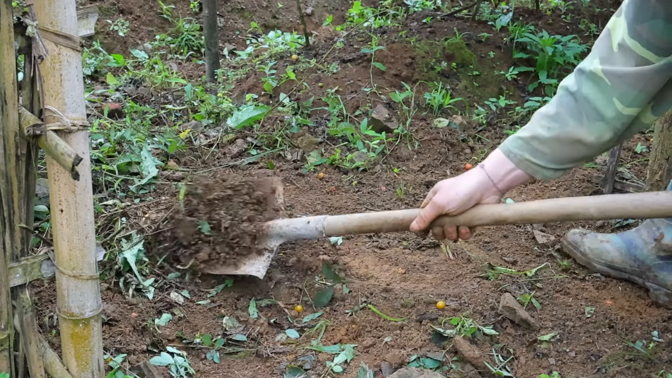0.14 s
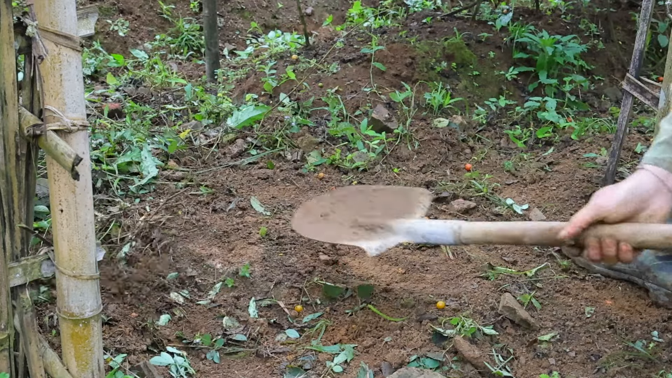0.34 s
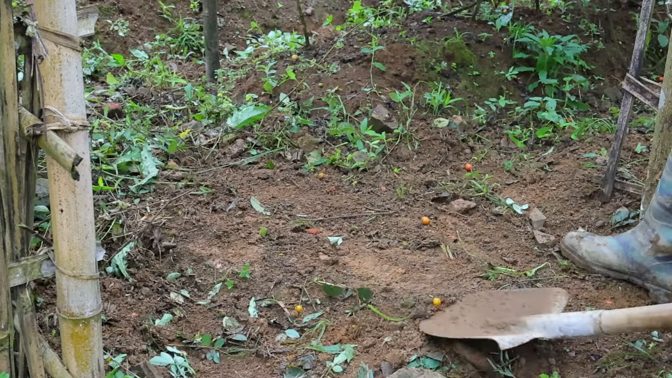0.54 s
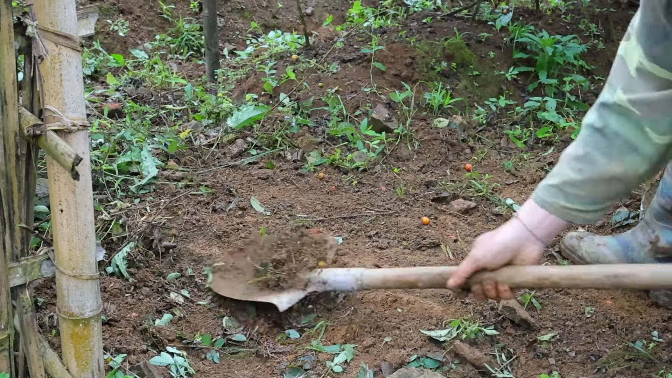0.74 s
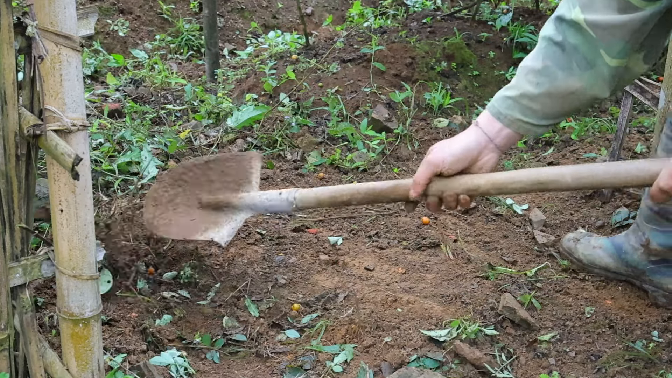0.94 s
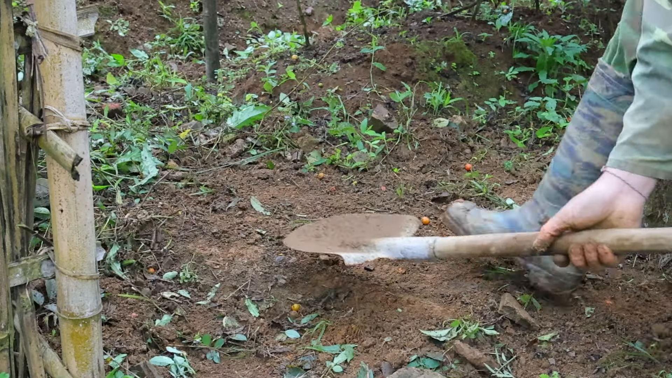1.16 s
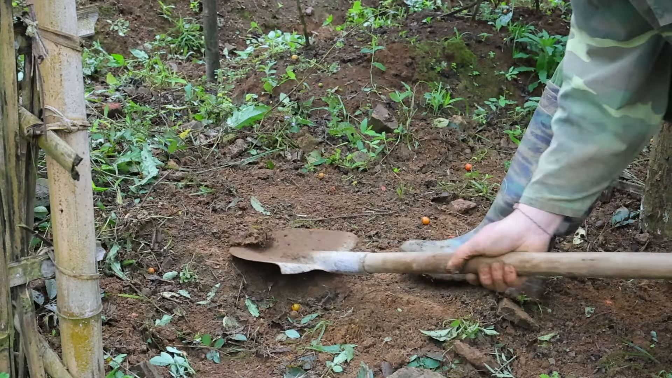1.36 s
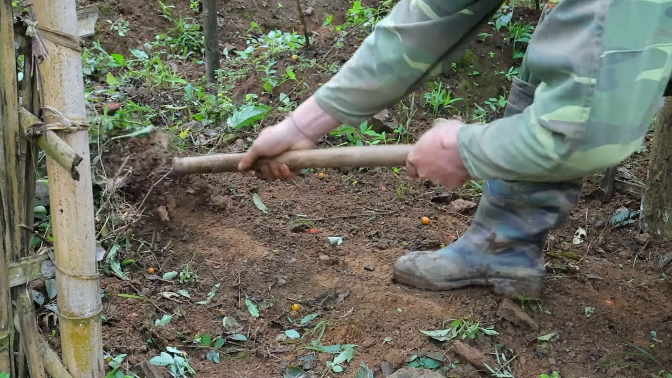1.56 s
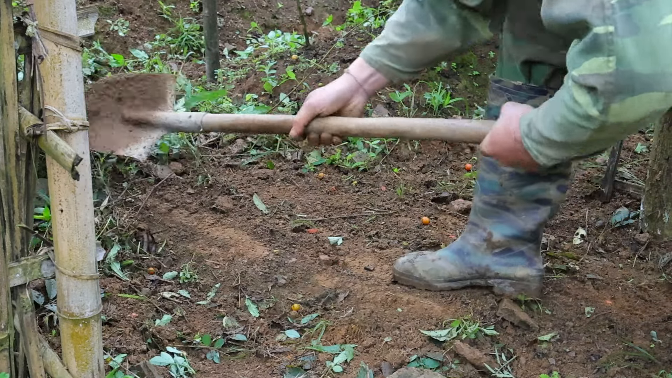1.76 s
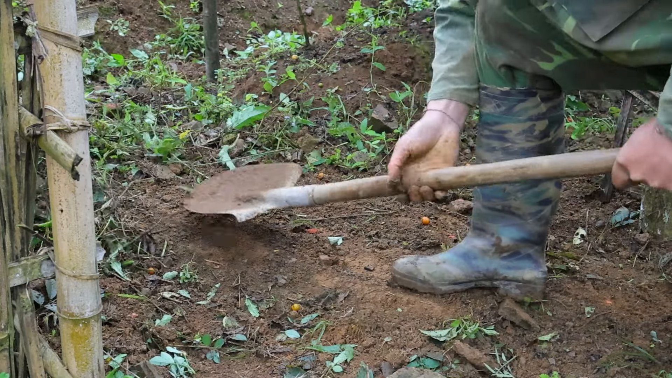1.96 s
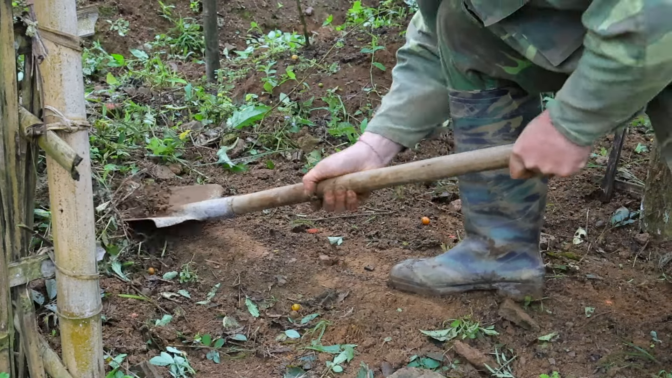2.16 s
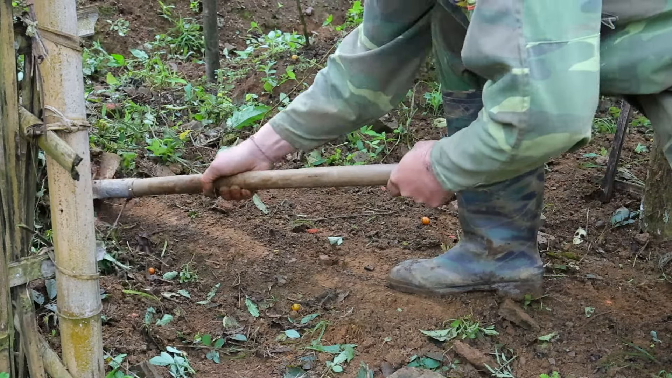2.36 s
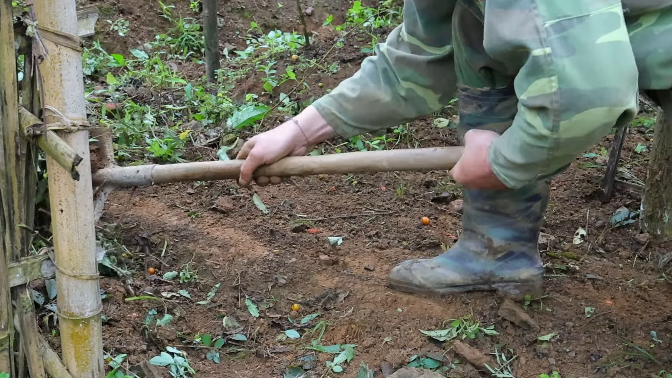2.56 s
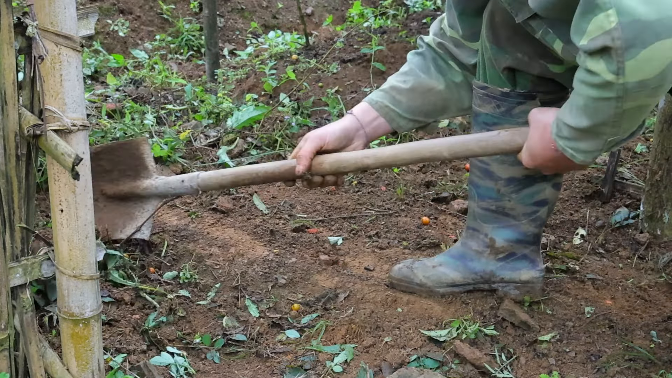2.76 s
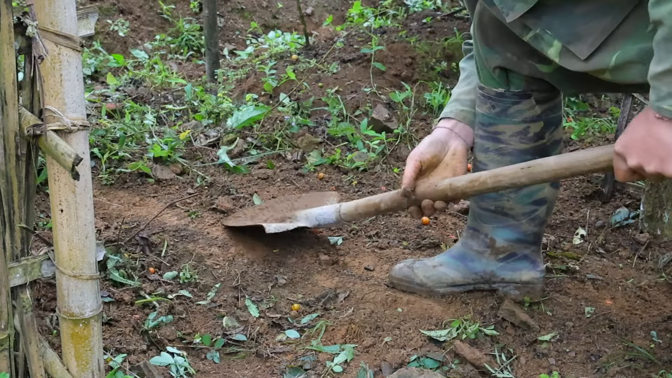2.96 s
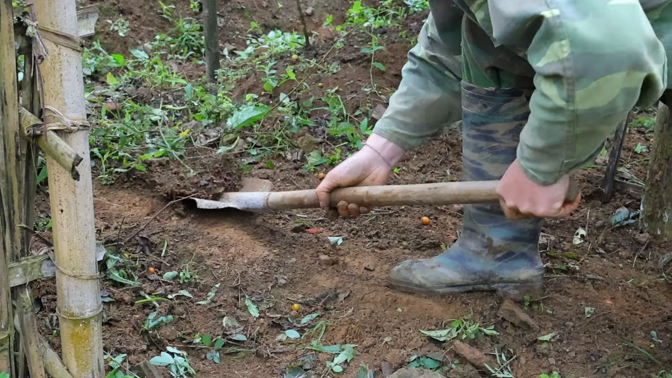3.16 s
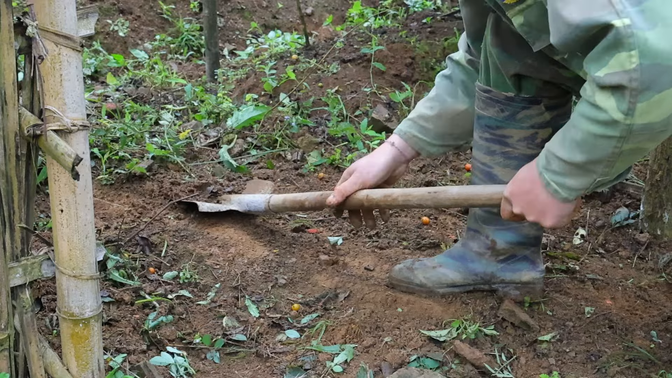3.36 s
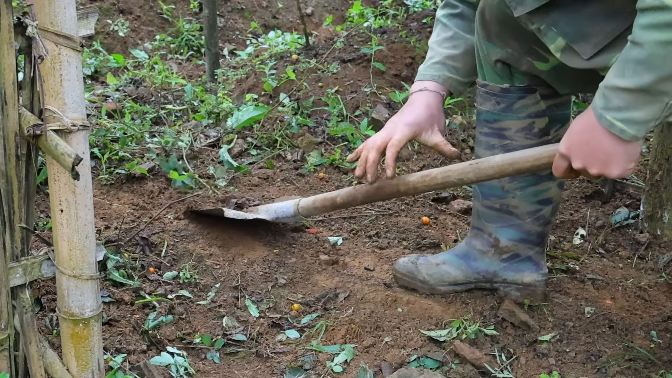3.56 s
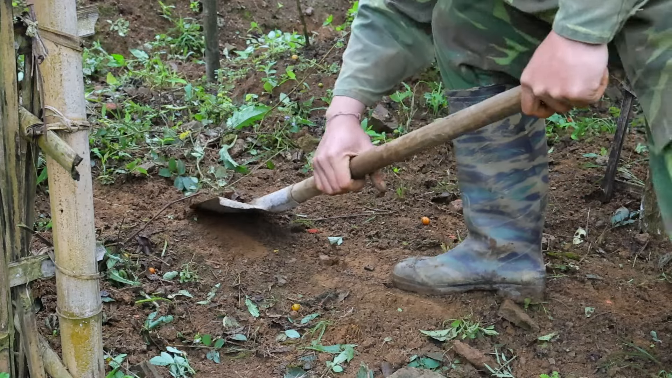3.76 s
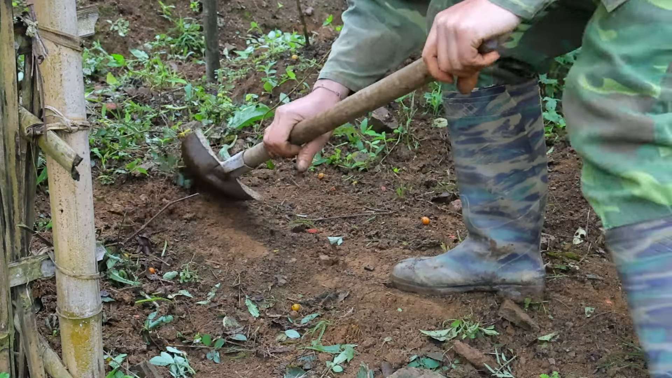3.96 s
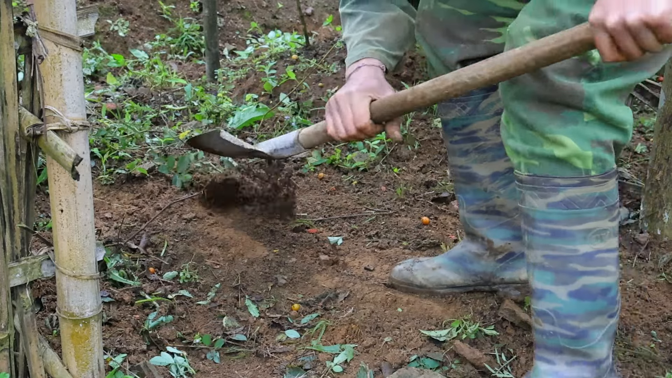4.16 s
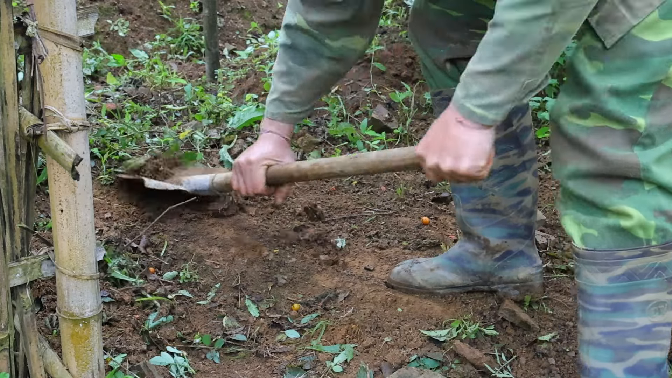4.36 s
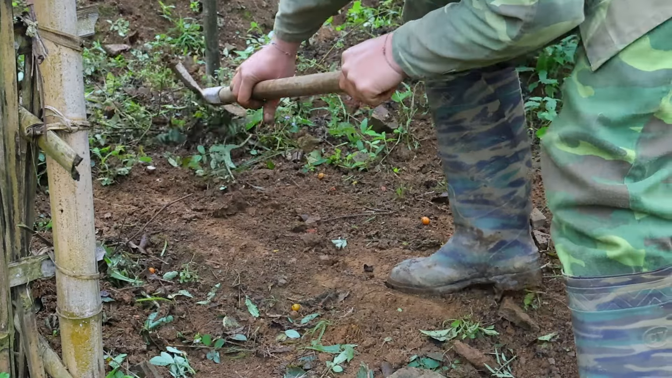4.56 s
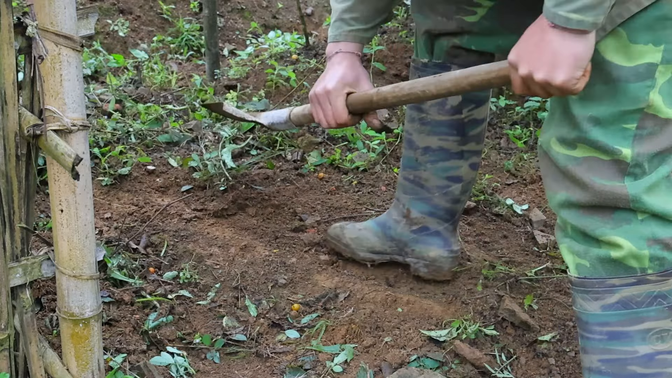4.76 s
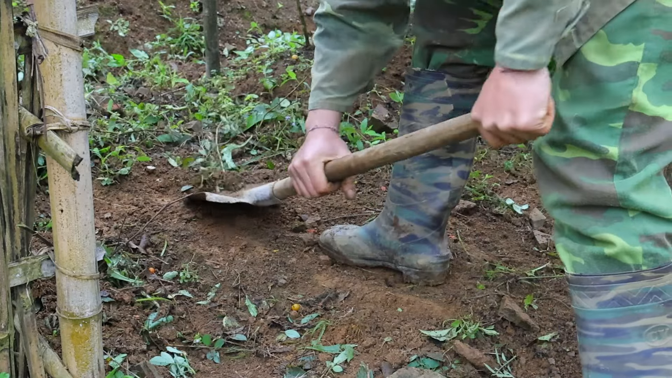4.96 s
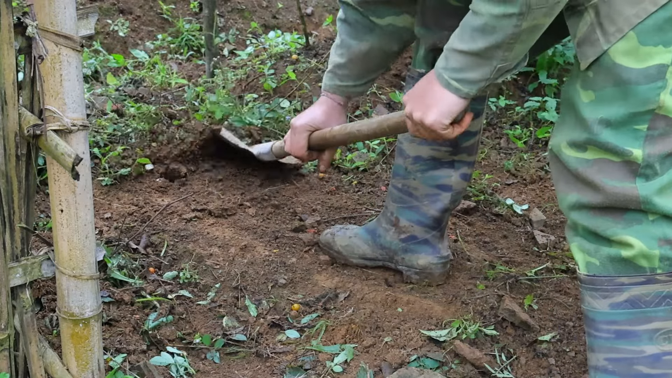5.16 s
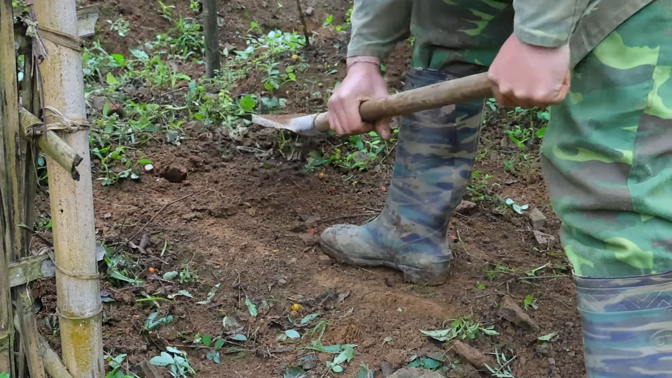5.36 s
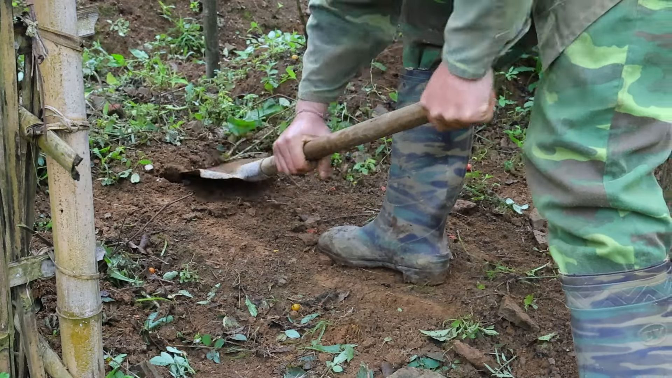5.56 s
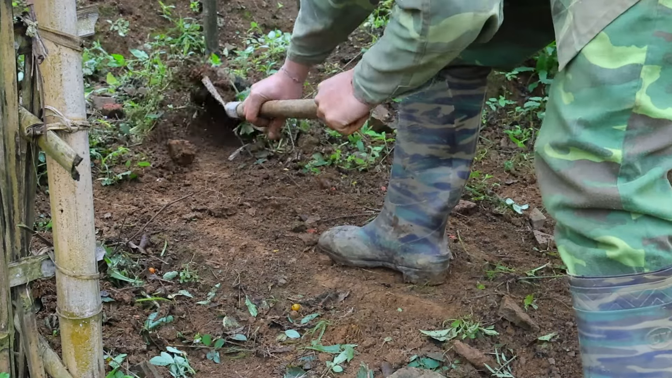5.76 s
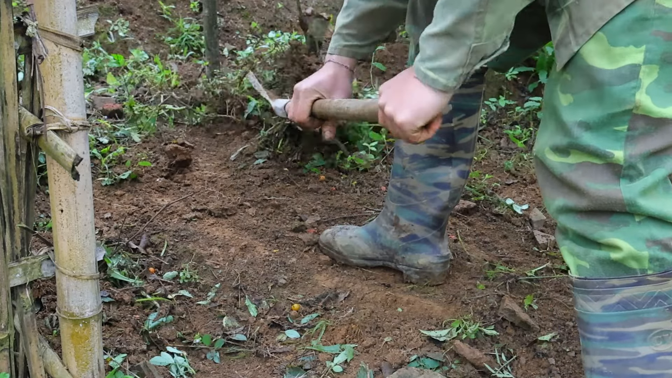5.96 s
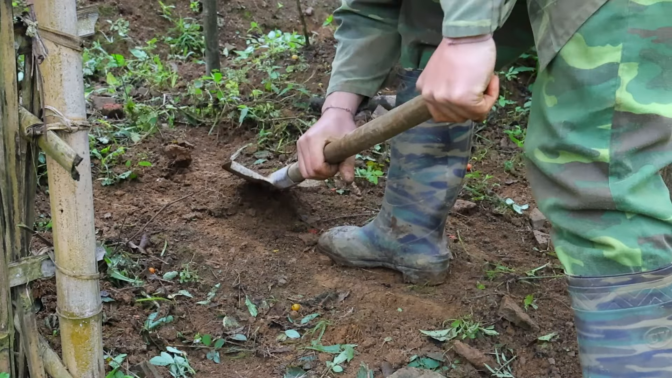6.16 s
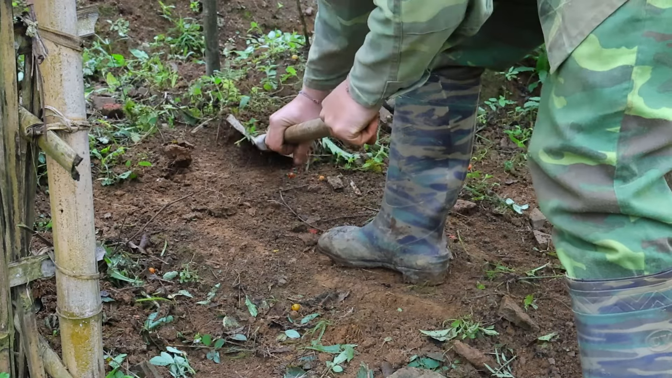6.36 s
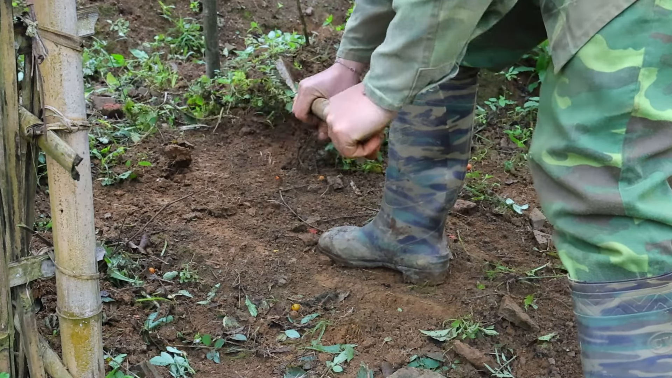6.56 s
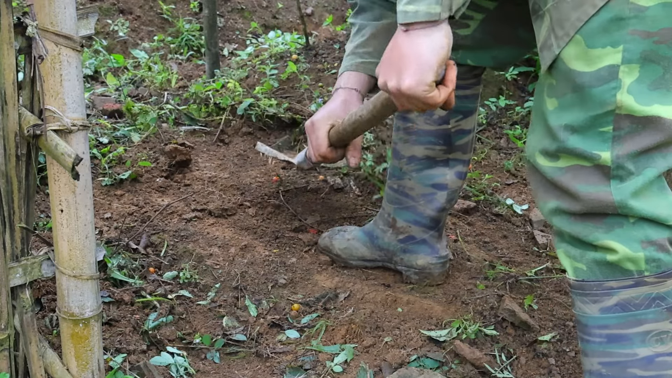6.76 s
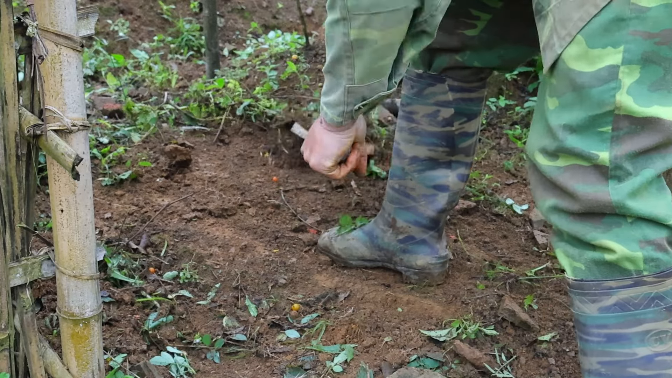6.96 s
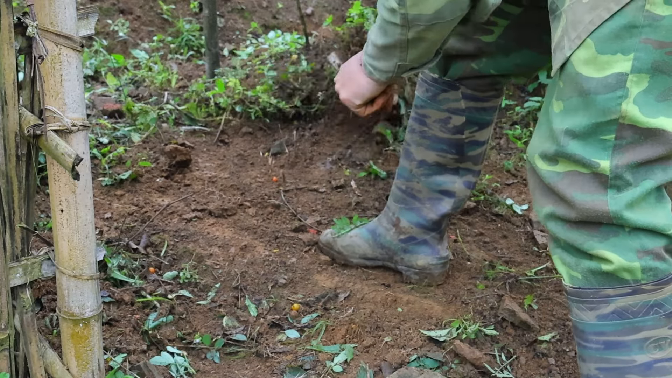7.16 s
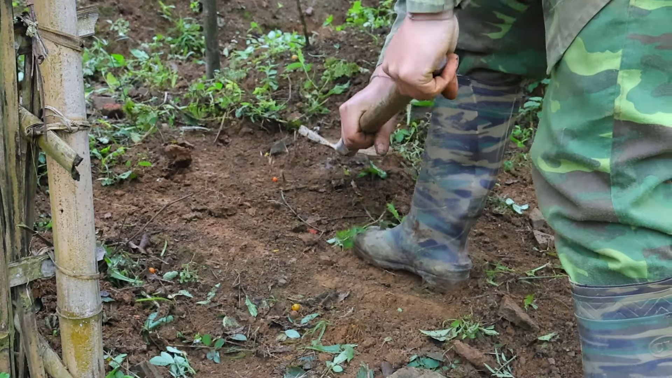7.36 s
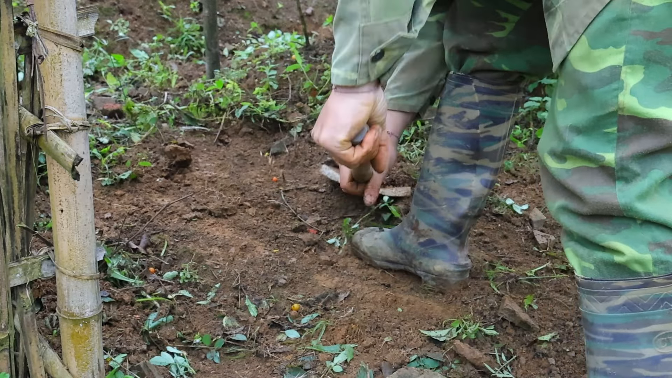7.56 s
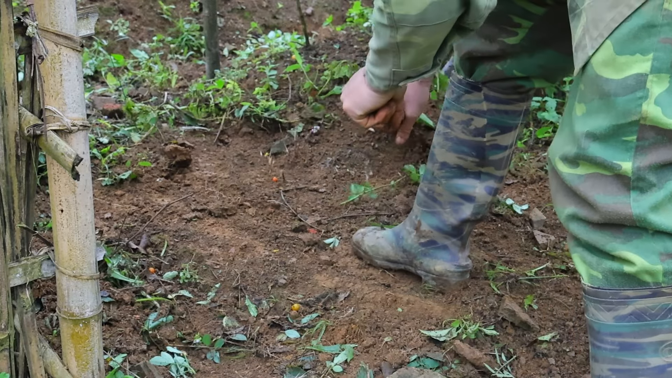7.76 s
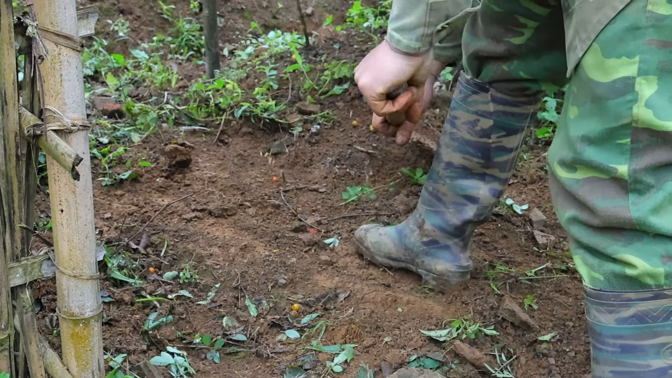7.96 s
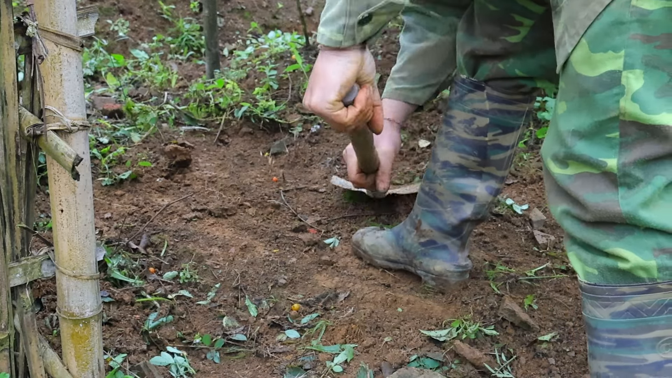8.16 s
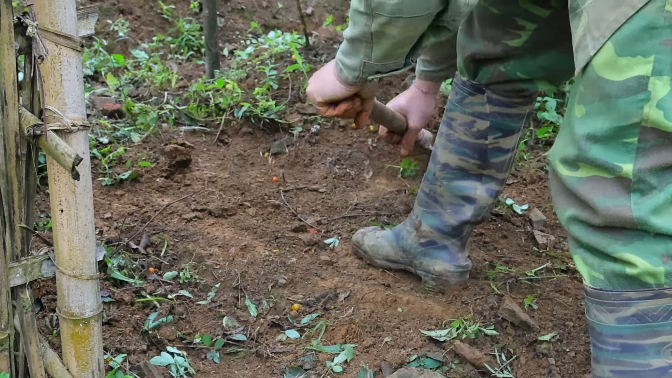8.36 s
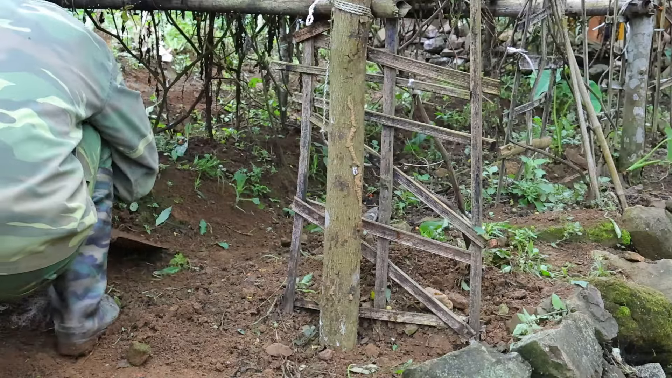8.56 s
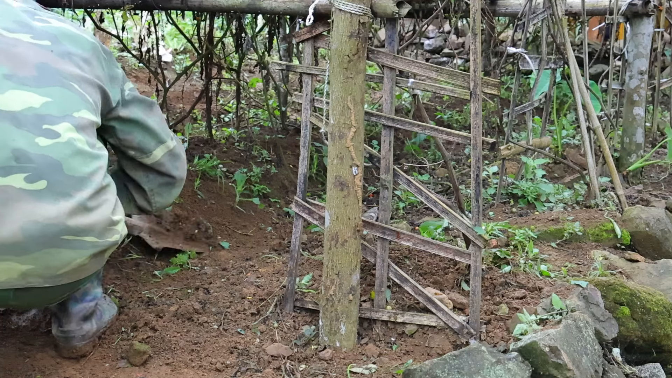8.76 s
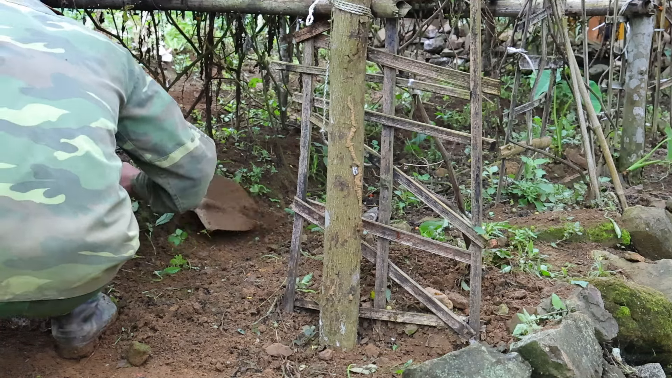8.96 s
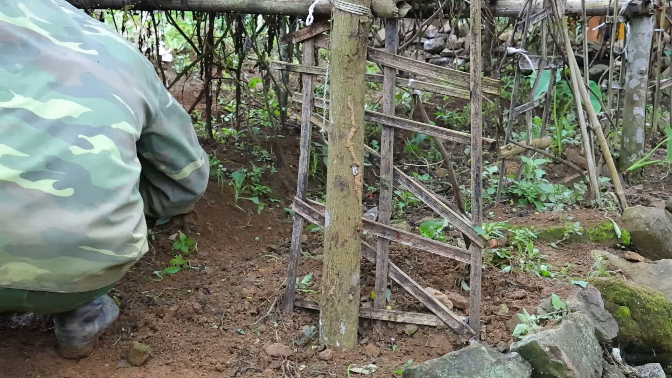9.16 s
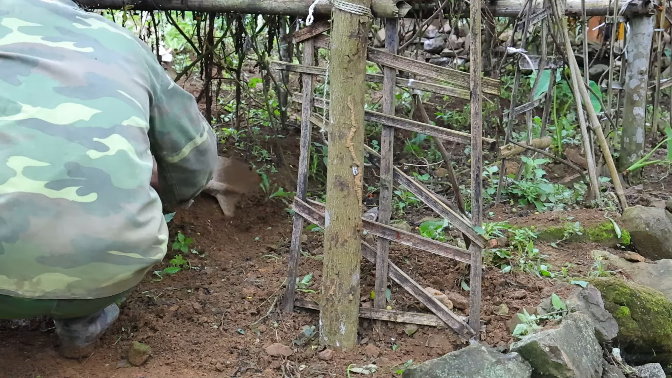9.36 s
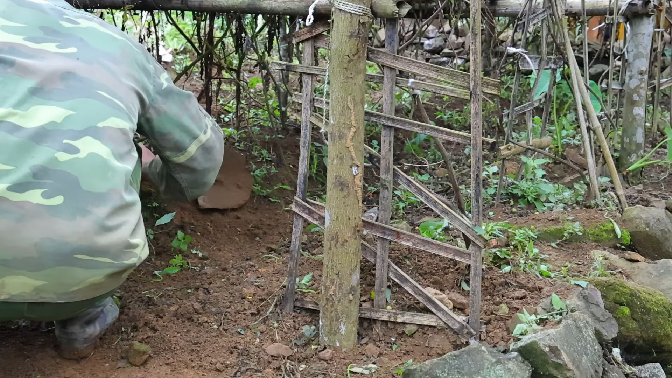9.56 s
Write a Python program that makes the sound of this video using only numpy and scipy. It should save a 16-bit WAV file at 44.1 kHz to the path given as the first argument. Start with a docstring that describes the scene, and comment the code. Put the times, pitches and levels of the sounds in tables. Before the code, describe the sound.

Close, dry shovel strokes bite into gritty earth, roots and pebbles crackling and clinking between short rustling pauses outdoors.

```python
"""Shovel in stony soil

A steel shovel blade chops and scrapes through stony garden soil close to a two-port microphone.
Strokes are rushes of filtered clicks; crunches are click swarms where clods and roots give way; stones
clink as roughened sines. The blade is a bank of modes, short in the soil and long in the air, over
low thumps of boots and blade, distant resonant noise and a quiet outdoor hiss."""
import sys
import numpy as np
from scipy import signal
from scipy.fft import rfft, irfft, next_fast_len
from scipy.io import wavfile
from scipy.ndimage import uniform_filter1d

SR = 44100
rng = np.random.default_rng(int(sys.argv[2]) if len(sys.argv) > 2 else 0)


def dump(signal):
    """Clip the signal to [-1, 1] and save it as 16-bit WAV at the path in sys.argv[1]."""
    limited = np.clip(np.atleast_2d(signal).T, -1, 1)
    pcm = np.round(limited * 32767).astype(np.int16)
    wavfile.write(sys.argv[1], SR, pcm)


def boost_factor(decibels):
    """Convert a level in decibels to a linear amplitude factor."""
    exponent = np.asarray(decibels, float) / 20
    return 10 ** exponent


N = 423801
SIZE = next_fast_len(N + SR, True)  # FFT length with room for tails

# Colour of leaves and air: pitch_hz, relative level_db (per Hz)
AIR_COLOUR = [(25, 15), (60, -9.5), (200, -3), (450, -2.5), (1200, -3), (2400, -23), (5500, -15),
              (11000, -16.5), (16000, -19)]
AIR_DB = -53

# Hollow blips and low rumble in the background, mean levels: start_s, blips_db, rumble_db
DISTANT = [(0.0, -52.5, -57.5), (0.43, -54, -61), (0.85, -50, -67), (1.39, -56.5, -63), (3.16, -54, -62),
           (3.51, -53, -71), (4.44, -48.5, -51), (4.63, -62, -61), (5.17, -47.5, -58.5), (5.67, -61, -51.5),
           (6.13, -60.5, -64.5), (6.37, -49, -53), (6.66, -61, -65), (7.68, -49, -61), (8.03, -58.5, -65),
           (8.4, -52, -67), (8.99, -55.5, -75), (9.61, -63, -67)]
BLIP_HZ, BLIP_WANDER, BLIP_WIDTH_HZ = 710, 0.057, 130  # wander as a share of the pitch
RUMBLE_HZ, RUMBLE_WANDER, RUMBLE_WIDTH_HZ = 113, 0.064, 150

# Boots and blade landing on soft ground: start_s, level_db, settled pitch_hz, t60_s
THUMPS = [(1.315, -27, 104, 0.028), (2.125, -45, 75.4, 0.15), (3.246, -32, 240, 0.059),
          (4.234, -16.5, 161, 0.036), (4.45, -25.5, 109, 0.088), (4.893, -27, 178, 0.019),
          (5.111, -29, 127, 0.092), (5.676, -30, 69.5, 0.072), (6.235, -38.5, 167, 0.11)]

# Stones that clink with a pitch of their own: start_s, level_db, pitch_hz, t60_s
STONES = [(0.0267, -11.5, 3370, 0.047), (.137, -15, 3470, 0.027), (0.615, -18.5, 1232, 0.06),
          (.699, -17.5, 3630, .06), (0.711, -17, 3800, 0.044), (0.744, -19.5, 3290, .04),
          (2.2737, -27.5, 1510, 0.048), (3.168, -28, 3380, 0.036), (3.2536, -17.5, 902, 0.036),
          (4.225, -21, 1230, 0.019), (4.461, -17, 1504, 0.089), (4.4961, -20.5, 830, .07),
          (4.7485, -38, 2730, 0.074), (4.8762, -45, 1360, .03), (5.083, -18.5, 3140, 0.087),
          (5.6663, -23, 1654, 0.08), (6.393, -27.5, 1600, 0.047), (6.959, -24, 1350, 0.055),
          (7.0254, -15, 1210, 0.059), (8.2955, -15.5, 1366, 0.091), (8.4124, -14.5, 4510, 0.066),
          (8.872, -34.5, 4300, 0.032), (9.2145, -15, 2152, 0.069), (9.2148, -14.5, 4300, 0.028)]
CHATTER_WIDTH_HZ = 300

# Soil trickling and leaves rustling between strokes: start_s, level_db, crackle_db (against the level)
RUSTLE = [(0, -44.5, -1.5), (.9, -64.5, -7), (1.28, -66, 1), (1.8, -53, -0.5), (2.6, -53, -3),
          (3.05, -62, 5.5), (3.8, -53, -11), (4.2, -59, 1), (4.62, -55.5, 6), (4.82, -62.5, 6.5),
          (5.2, -49.5, -3.5), (5.45, -58, 0), (6.2, -55.5, 6), (6.7, -66.5, 4), (7.4, -55, 4),
          (8.0, -58, -18), (9.15, -69, -21), (9.35, -46.5, -2), (9.61, -59, -10)]

# Strokes of the blade and boots through grit:
# peak_s, level_db, crackle_db (above 4 kHz, against the level), rise_s, fall_s
STROKES = [(.005, -29, 11, 0.064, 0.12), (.15, -40, 1, 0.11, 0.11), (.5, -49.5, 0.5, 0.54, 0.092),
           (.63, -40, -17, 0.075, 0.11), (.72, -30.5, -1, 0.16, 0.43), (.91, -42.5, -1, .15, 0.35),
           (1.149, -48, 5.5, .2, 0.23), (1.37, -61, 12.5, 0.25, 0.067), (1.54, -30, 5, 0.27, 0.14),
           (1.64, -34, 4, 0.33, 0.34), (2.32, -29.5, 3.5, 0.36, 0.32), (2.88, -45, -5.5, 0.36, 0.47),
           (3.18, -26.5, 6, 0.14, 0.21), (3.241, -28, -6, 0.22, .075), (3.46, -54, 11, .08, 0.12),
           (3.64, -52, 10.5, 0.14, 0.48), (3.922, -40, 6, 0.44, 0.36), (4.481, -35, 0.5, 0.34, 0.37),
           (4.89, -44.5, -1.5, 0.2, 0.23), (5.09, -22.5, -1, 0.03, 0.14), (5.7, -26, 3.5, 0.075, 0.23),
           (6.421, -34.5, 5, 0.37, 0.2), (6.88, -52.5, -1.5, 0.36, 0.38), (7.019, -27.5, -0.5, 0.11, 0.27),
           (7.682, -19, 3.5, 0.074, 0.053), (7.791, -38, 3.5, 0.36, 0.19), (8.292, -29.5, 0, 0.068, 0.28),
           (8.43, -47, 12.5, 0.44, 0.23), (8.57, -36.5, -9, 0.14, .1), (8.83, -61.5, 0.5, 0.16, 0.19),
           (8.879, -44.5, 2.5, 0.33, 0.39), (9.238, -39.5, 1, 0.062, 0.18), (9.5, -50, 4, 0.97, 0.075)]
EDGE_DB = 38.5  # drop from the peak over one rise or fall time
CRACKLE_STEEPER = 1.5  # the treble comes later and leaves sooner
SLIDE_THUD_DB, CRUMBS_DB, SLIDE_RING_DB = -9.5, -3.5, -6

# Colour of grit on steel, before a bass cut: pitch_hz, relative level_db (per Hz)
GRIT_COLOUR = [(35, -105), (60, -32.5), (527, -12.5), (749, -8.5), (882, 0.5), (1440, 2), (2090, 0),
               (2840, 0), (5460, -5), (7400, -14), (12700, -19), (16000, -32)]

# Modes of the blade, relative levels: pitch_hz, air_db, t60_s (in the air), soil_db
BLADE = [(566, -28, 1, -60), (698, -29.5, 0.74, 0), (830, -14.5, 0.28, -48), (1150, -54, 0.125, 3),
         (1252, -0.5, 0.28, 1), (1490, -3, .12, -29.5), (1693, -10, 0.14, -39.5), (1774, -37, 0.26, 7),
         (2010, -3, 0.23, -46), (2028, -35, 0.098, 17), (2310, -12.5, 0.12, -23.5), (3030, -43, 0.047, -52),
         (3290, -22, 0.058, 11), (3626, -3.5, 0.068, 13.5), (3950, -52, 0.11, 6), (4230, -43, .07, -6),
         (5265, -46, 0.079, -38)]
SOIL_T60_S = .07  # decay that the soil's loss alone would give
AIR_RING_DB, SOIL_RING_DB = 7.5, -13

# A blow while the load has left the blade: start_s, end_s
AIRBORNE = (.86, .9)
RATTLE = 1  # share of the grit that also rings the free blade

# The loudest bursts of breaking soil: start_s, relative level_db, thud_db (below 750 Hz, against the level),
# crackle_db (above 4 kHz, against the level), t60_s (held within 0.004 to 0.15)
CRUNCHES = [(.003, -25, -33, -6, 0.073), (.012, -22.5, -32, 0, 0.068), (.0255, -11.5, -32, -3, 0.031),
            (.092, -23.5, -42, -2.5, 0.029), (.1364, -22, -51, 13, 0.043), (.6066, -32.5, 12, -19.5, 0.021),
            (.6151, -5.5, 0, -15, .043), (.6781, -28.5, -14, 2, 0.054), (.6979, -16, -46, 13.5, 0.055),
            (.744, -21.5, -42, 3, 0.082), (.712, -20, -33, 1, .015), (.7663, -12.5, -34, 3, 0.013),
            (.8, -20, -42, 3, 0.06), (.8664, -10.5, -9, -4, 0.057), (1.4735, -31, -3, -14, 0.14),
            (1.4906, -19.5, -43, 1.5, 0.074), (1.5281, -11.5, -40, 8, 0.066),
            (1.5761, -23.5, -35, 9, 0.059), (1.608, -24.5, -25, 6, 0.11), (1.6347, 4, -47, -2.5, .01),
            (1.6495, -12.5, -21, 1, 0.038), (1.6845, -21.5, -5.5, -9, 0.044), (1.872, -29, 7, -16, .009),
            (2.1297, -41.5, -3, 18.5, 0.019), (2.191, -26, -27, 2.5, 0.025), (2.242, -18, -19, 5.5, 0.1),
            (2.2934, -12.5, -32, 15.5, 0.0085), (2.3024, -13.5, -48, 2, 0.024),
            (2.3121, -15, -43, -8, 0.04), (2.3386, -14.5, -9, 4.5, 0.05), (2.3699, -18, -3, -28, 0.037),
            (2.3843, -13.5, -19, -11, 0.016), (2.422, -20, -20, -11, 0.064),
            (2.5124, -24.5, -34, -3.5, 0.05), (2.5563, -24, -26, 0.5, 0.02), (2.661, -26.5, -15, -3, 0.018),
            (2.7813, -40, -27, 4, 0.019), (2.8024, -28.5, -27, -16, 0.022), (2.8542, -24, -26, -7, 0.025),
            (3.15, -14, -10, 8.5, 0.071), (3.1669, -15, -27, 9, .014), (3.1796, -6, -5, -11, 0.036),
            (3.204, -18, -3, -14, 0.036), (3.2323, -7, -4, 2, .043), (3.2526, -18, -15, 1, .014),
            (3.4647, -34.5, -41, 1, 0.027), (3.652, -35, -20, 7, 0.027), (3.7, -41.5, -20, 8, 0.03),
            (3.728, -38, -25, 12, 0.017), (3.8987, -43, 12, 10, 0.055), (3.9222, -18.5, 2.5, -1, 0.044),
            (4.2266, -17.5, -7, -43, 0.0076), (4.2346, -28, 6, -30, 0.031), (4.371, -35.5, 12, -23, 0.045),
            (4.4321, -22, -1, 8, 0.076), (4.461, -5.5, -4.5, -3.5, 0.075), (4.4954, -24.5, 0, -5, 0.13),
            (4.6153, -42.5, -33, 12, .04), (4.7479, -26, -3, -32, .015), (4.8756, -30, -28, -24, 0.027),
            (4.9002, -30, 5.5, -15, 0.022), (5.051, -35, -24, -9, 0.022), (5.062, -11.5, -18, -3, 0.081),
            (5.0731, -3.5, -21, -4.5, 0.013), (5.0817, -14.5, -20, 8.5, 0.028),
            (5.1146, -4.5, -4.5, -0.5, 0.037), (5.1905, -30.5, -6, -1.5, 0.086),
            (5.252, -30.5, -40, -20, 0.022), (5.6648, -11, -17, -5, 0.019), (5.6836, -11, -1.5, 7.5, 0.037),
            (5.733, -18.5, -43, -1, 0.029), (5.7492, -25, -9, 8.5, 0.03), (5.7827, -30, 4, 5, 0.027),
            (6.2786, -50, -10, 9, 0.013), (6.3036, -32, -4, 4.5, 0.093), (6.346, -19.5, -23, -0.5, 0.085),
            (6.3743, -20.5, -26, -16, 0.062), (6.3916, -19, -7, -11, 0.13), (6.402, -6, -44, -3, 0.0035),
            (6.4248, -16.5, -0.5, 2.5, 0.099), (6.7, -44.5, 6.5, -19, 0.17),
            (6.9581, -12.5, -12.5, 1, 0.031), (6.9695, -14.5, -12, -10, .091),
            (7.0016, -22.5, -5, 4.5, 0.093), (7.0142, -18.5, -5, 7.5, 0.066),
            (7.0264, -8.5, -11, -10, 0.029), (7.046, -35, -26, 2, 0.017), (7.0893, -10, -9, -1, 0.038),
            (7.6442, -3, -12, -8, 0.034), (7.6796, -12, 0.5, 2, 0.07), (7.7397, -13, -6.5, -4, 0.039),
            (7.7486, -19.5, -1, -7, .057), (7.7816, -17.5, -11, -2.5, 0.03),
            (7.8293, -24, -3.5, -9.5, 0.028), (8.2543, -19.5, -6.5, -43, 0.027),
            (8.284, -40, -13, 19, 0.067), (8.2957, -12, -5.5, 1, 0.083), (8.3115, -22.5, -10, 17, 0.034),
            (8.3574, -34, 14, 4, 0.052), (8.3764, -27, 3, 3, 0.12), (8.4103, -10, -3, 11, 0.056),
            (8.5644, -23, -11.5, 1.5, 0.057), (9.2134, -10.5, -39, -3, 0.037),
            (9.2814, -28, -24, -13, 0.073), (9.3009, -30, -29, -6, 0.037), (9.342, -41, -13, 9, 0.072),
            (9.366, -32, -2, 0, 0.075), (9.492, -33, 6.5, -16, 0.057), (9.5093, -37, -26, 8, 0.031),
            (9.5686, -32.5, 12.5, -34, 0.093)]
CLOD_HZ, CLOD_WIDTH_HZ, CLOD_DB, CLOD_SCATTER = 1900, 300, -10, .25  # scatter in octaves
OCTAVES_PER_DB = .025  # brighter bursts come from smaller, higher pieces
# The bend of the blade that hard blows ring, shifted by the load; level against the clod, scatter in octaves
NOTE_HZ, NOTE_WIDTH_HZ, NOTE_DB, NOTE_SCATTER = 2030, 37, 1, 0.026
SNAP = 2.2  # first break against the peak of the burst's envelope

# Small breaks at random moments, as strong as the grit flows: centres of the random draws
SMALL_DB, SMALL_SPREAD_DB, SMALL_THUD_DB, SMALL_CRACKLE_DB, SMALL_T60_S = 0, 3, -7, 0, 0.048

# Likeness of the two ports: pitch_hz, likeness (0 to 1)
LIKENESS = [(60, .96), (500, .985), (1500, .96), (3000, .78), (6000, .45), (15000, .15)]
# Balance of the ports: pitch_hz, left_over_right_db
LEAN = [(60, -1), (700, -1.2), (1300, -2), (2400, -4), (4400, -1), (15000, -.6)]
# Phase between the ports: pitch_hz, left_lead_rad
LEAD = [(60, -.15), (700, -.1), (1980, -.35), (3190, .9), (7000, .75), (15900, 1.7)]
NOTCH_HZ, NOTCH_WIDTH_HZ, NOTCH_DB = 11300, 120, -10  # dip of the microphone housing


def evened(x):
    """Scales a signal to rms 1."""
    return x / np.sqrt(np.mean(x ** 2) + 1e-20)


def read(points, hz):
    """Reads a spectrum table at the frequencies hz, on a log pitch scale."""
    f, value = np.transpose(points)
    return np.interp(np.log(hz + 1), np.log(f + 1), value)


def columns(rows):
    """Draws every column after the first as a curve, sample by sample."""
    s, *values = np.transpose(rows)
    return [np.interp(np.arange(N) / SR, s, v) for v in values]


def causal(gain, size=4096):
    """Minimum-phase impulse of energy 1 for a gain given on the bins of an rfft."""
    log = np.log(np.maximum(np.r_[gain, gain[-2:0:-1]], 1e-5))
    taps = np.fft.ifft(np.exp(np.conj(signal.hilbert(log)))).real[:size // 2]
    return taps / np.linalg.norm(taps)


def slow(per_s, channels=1):
    """Smooth random drift of rms 1: noise averaged twice over 1 / per_s seconds."""
    width = round(SR / per_s)
    noise = rng.standard_normal((channels, N))
    return evened(uniform_filter1d(uniform_filter1d(noise, width), width))


def ports(one, other):
    """Two ports hear the bass nearly alike and the treble each in its own way."""
    same = np.clip(read(LIKENESS, np.fft.rfftfreq(SIZE, 1 / SR)), 0, 1)
    mixed = same * rfft(one, SIZE) + np.sqrt(1 - same ** 2) * rfft(other, SIZE)
    return np.array([one, irfft(mixed, SIZE)[:N]])


def grains(per_s, spread_db):
    """Dense clicks of random sign, a few of them large."""
    size = boost_factor(spread_db * np.minimum(rng.exponential(1, N), 5)) * (rng.random(N) < per_s / SR)
    one, other = size * rng.choice([-1., 1.], (2, N))
    return ports(evened(one), evened(np.roll(other, 1)))


def resonate(x, hz, width):
    """Moving resonance: shifts the curve hz down to zero, smooths twice, and shifts back."""
    turn = np.exp(2j * np.pi * np.cumsum(hz) / SR)
    r = np.exp(-np.pi * width / SR)
    smooth = signal.lfilter([1], np.convolve([1, -r], [1, -r]), x / turn)
    return evened((turn * smooth).real)


def outdoors():
    """Smooth wide hiss of leaves and air: coloured noise with a gently drifting level."""
    hz = np.fft.rfftfreq(SIZE, 1 / SR)
    noise = ports(*rng.standard_normal((2, N)))
    hiss = irfft(rfft(noise, SIZE) * boost_factor(read(AIR_COLOUR, hz)), SIZE)[:, :N]
    return boost_factor(AIR_DB + 2.5 * slow(6)) * evened(hiss)


def distant():
    """Sparse taps ring a wandering hollow note; the rumble is lumpy noise round a drifting low pitch."""
    blips_db, rumble_db = columns(DISTANT)
    blips_hz = BLIP_HZ * (1 + BLIP_WANDER * slow(3.9)[0])
    blips_hz = blips_hz * (1 + 0.058 * slow(43)[0])  # fast flutter
    rumble_hz = RUMBLE_HZ * (1 + RUMBLE_WANDER * slow(4.3)[0])
    blips = resonate(grains(320, 3.9), blips_hz, BLIP_WIDTH_HZ)
    rumble = resonate(ports(*rng.standard_normal((2, N))), rumble_hz, RUMBLE_WIDTH_HZ)
    blips_gain = boost_factor(blips_db + 2 * slow(32) + 3.65 * slow(7.2) - 1.5)
    return blips_gain * blips + boost_factor(rumble_db + 2.0 * slow(3.4)) * rumble


def thumps():
    """Soft ground gives a few low cycles that sag quickly to their settled pitch."""
    out, t = np.zeros(N), np.arange(SR // 4) / SR
    for s, db, hz, t60 in THUMPS:
        turns = hz * (t + 0.0037 * (1 - np.exp(-t / 0.0014)))
        envelope = boost_factor(db - 60 * t / t60) * (1 - np.exp(-t / 0.0035))
        out[round(s * SR):][:len(t)] += envelope * np.sin(2 * np.pi * turns)
    return out


def stones():
    """Each stone is a dying note, roughened as the stone chatters on the steel."""
    out, t = np.zeros((2, N)), np.arange(SR // 10) / SR
    r = np.exp(-np.pi * CHATTER_WIDTH_HZ / SR)
    for s, db, hz, t60 in STONES:
        a, b = rng.standard_normal((2, 2, len(t)))
        chatter = 1 + 0.39 * np.sqrt(1 - r * r) * signal.lfilter([1], [1, -r], a + 1j * b)
        envelope = boost_factor(db - 60 * t / t60) * (1 - np.exp(-t / 0.00027))
        note = envelope * (chatter * np.exp(2j * np.pi * hz * t)).imag
        out[:, round(s * SR):][:, :len(t)] += note
    return ports(*out)


def ring(airborne):
    """Impulse of the blade as dying modes; clinging soil adds the same loss to every mode."""
    t, out = np.arange(SR // 2) / SR, 0
    for hz, air_db, t60, soil_db in BLADE:
        loss_db_per_s = 60 / t60 + (0 if airborne else 60 / SOIL_T60_S)
        level_db = air_db if airborne else soil_db
        out = out + boost_factor(level_db - loss_db_per_s * t) * np.sin(2 * np.pi * hz * t)
    return out / np.linalg.norm(out)


def sounded(thud, body, crackle, rings):
    """Three drives pass the low, middle and high parts of the grit colour; others ring the blade."""
    hz = np.fft.rfftfreq(4096, 1 / SR)
    low = 1 / (1 + (hz / 750) ** 4)
    high = 1 - 1 / (1 + (hz / 4000) ** 6)
    colour = boost_factor(read(GRIT_COLOUR, hz)) / (1 + (130 / (hz + 1)) ** 3)  # bass cut
    parts = [(thud, causal(colour * low)),
             (body, causal(colour * (1 - low) * (1 - high))),
             (crackle, causal(colour * high))]
    return irfft(sum(rfft(drive, SIZE) * rfft(taps, SIZE) for drive, taps in parts + rings), SIZE)[:, :N]


def flowing():
    """Levels of the grit and of its crackle in dB: every stroke swells and fades over the rustle."""
    t = np.arange(0, N, 64) / SR
    s, db, crackle_db, rise, fall = np.transpose(STROKES)[:, :, None]
    down = EDGE_DB * np.maximum((s - t) / rise, (t - s) / fall)
    at, rest_db, rest_crackle_db = np.transpose(RUSTLE)
    body = (boost_factor(db - down) ** 2).sum(0) + boost_factor(np.interp(t, at, rest_db)) ** 2
    top = (boost_factor(db + crackle_db - CRACKLE_STEEPER * down) ** 2).sum(0)
    top = top + boost_factor(np.interp(t, at, rest_db + rest_crackle_db)) ** 2
    return [np.interp(np.arange(N) / SR, t, 10 * np.log10(power)) for power in (body, top)]


def slide():
    """Grit comes in clumps along the stroke; loose crumbs tick in short-lived patches of pitch."""
    db, crackle_db = flowing()
    flow = grains(3000, 1.65) * boost_factor(3 * slow(50) - 3)
    body = flow * boost_factor(db)
    rings = [(body, boost_factor(SLIDE_RING_DB) * ring(False))]
    sound = sounded(body * boost_factor(SLIDE_THUD_DB), body, flow * boost_factor(crackle_db), rings)
    frames = np.arange(0, N, 441)  # a new patch level every 10 ms
    for hz in np.geomspace(1100, 7000, num=7):
        patch = np.interp(np.arange(N), frames, boost_factor(10.6 * rng.standard_normal(len(frames)) - 16.5))
        drive_db = np.where(hz > 4000, crackle_db, db)
        ticks = signal.lfilter(*signal.iirpeak(hz, 7.5, SR), flow * patch)
        sound += boost_factor(CRUMBS_DB + drive_db) * np.sqrt(SR / hz) * ticks
    return sound


def small_breaks(count):
    """Scatters rows like those of CRUNCHES by chance, none in the airborne blow or 0.1 s after it."""
    when, size, a, b, c = rng.random((count, 5)).T
    s = when * (N / SR - .02)
    db, crackle_db = (v[(s * SR).astype(int)] for v in flowing())
    level_db = db + SMALL_DB + SMALL_SPREAD_DB * np.minimum(-np.log(size), 2.5)
    thud_db = SMALL_THUD_DB + 24 * (a - .5)
    bright_db = crackle_db - db + SMALL_CRACKLE_DB + 12 * (b - .5)
    rows = np.c_[s, level_db, thud_db, bright_db, SMALL_T60_S * (.3 + 1.4 * c)]
    return rows[(s < AIRBORNE[0]) | (s > AIRBORNE[1] + .1)]


def pitched(burst, hz, width):
    """A two-pole resonance gives the burst a pitch at unchanged energy."""
    r = np.exp(-np.pi * width / SR)
    note = signal.lfilter([1, 0, -1], [1, -2 * r * np.cos(2 * np.pi * hz / SR), r * r], burst)
    return note * np.linalg.norm(burst) / np.linalg.norm(note)


def crunches():
    """Click swarms swell fast and die, treble first; the clod adds a broad pitch, the blade a note."""
    swarm, t = grains(7000, 3.2) * boost_factor(3 * slow(200)), np.arange(SR // 8) / SR
    thud, body, crackle, clods, blows = np.zeros((5, 2, N))
    rows = np.r_[CRUNCHES, small_breaks(count=260)]
    scatter = [CLOD_SCATTER, NOTE_SCATTER] * rng.standard_normal((len(rows), 2))
    for (s, db, thud_db, crackle_db, t60), (octaves, shift) in zip(rows, scatter):
        at, t60 = round(s * SR), np.clip(t60, .004, .15)
        # longer bursts start softer
        shape = boost_factor(db - 3.5 - 60 * t / t60) * (1 - np.exp(-t / (0.061 * t60)))
        burst = shape[:N - at] * swarm[:, at:at + len(t)]
        burst *= np.linalg.norm(shape) * np.sqrt(2) / np.linalg.norm(burst)  # the blow sets the energy
        burst[:, np.argmax(shape) // 2] += SNAP * shape.max()  # the first break is one sharp snap
        blows[:, at + np.argmax(shape)] = np.linalg.norm(shape)
        span = slice(at, at + burst.shape[1])
        thud[:, span] += boost_factor(thud_db) * burst
        body[:, span] += burst
        crackle[:, span] += boost_factor(crackle_db - 15 * t[:N - at] / t60) * burst
        clod_hz = CLOD_HZ * 2 ** (octaves + OCTAVES_PER_DB * np.clip(crackle_db, -30, 15))
        clods[:, span] += pitched(burst, clod_hz, CLOD_WIDTH_HZ)
        hard_db = -.25 * np.clip(thud_db, -40, 0)  # a hard stone thuds less and rings more
        clods[:, span] += boost_factor(NOTE_DB + hard_db) * pitched(burst, NOTE_HZ * 2 ** shift, NOTE_WIDTH_HZ)
    free = (np.arange(N) > AIRBORNE[0] * SR) & (np.arange(N) < AIRBORNE[1] * SR)
    rings = [(body * ~free, boost_factor(SOIL_RING_DB) * ring(False)),
             ((blows + RATTLE * body) * free, boost_factor(AIR_RING_DB) * ring(True))]
    return sounded(thud, body, crackle, rings) + boost_factor(CLOD_DB) * clods


def scene():
    """Sums background, ground, stones, grit and breaking soil."""
    return outdoors() + distant() + thumps() + stones() + slide() + crunches()


def band_limit(x):
    """A steep low-pass at the top of the band."""
    return signal.sosfilt(signal.butter(12, 16400, fs=SR, output="sos"), x)


def record(dry):
    """Microphone: housing dip, bass cut, balance and phase of the ports, and a hard ceiling."""
    hz = np.fft.rfftfreq(SIZE, 1 / SR)
    halves = [.5, -.5]  # each port takes half of the left-right difference
    db = NOTCH_DB * np.exp(-((hz - NOTCH_HZ) / NOTCH_WIDTH_HZ) ** 2) + np.outer(halves, read(LEAN, hz))
    db = db - 10 * np.log10(1 + (52 / (hz + 1)) ** 7)  # the capsule drops the deepest bass
    phase = np.exp(1j * np.outer(halves, read(LEAD, hz)))
    heard = irfft(rfft(dry, SIZE) * boost_factor(db) * phase, SIZE)[:, :N]
    return band_limit(np.clip(heard, -1, 1))


dry = scene()
out = record(dry)
dump(out)
```